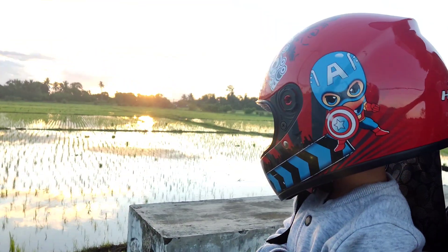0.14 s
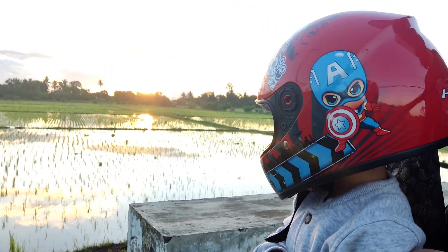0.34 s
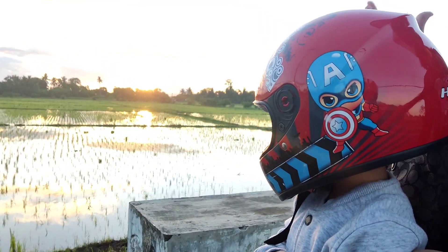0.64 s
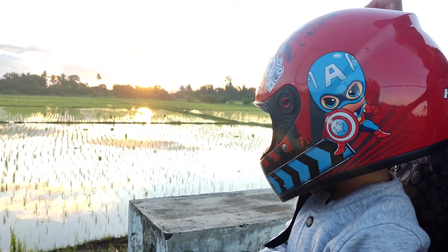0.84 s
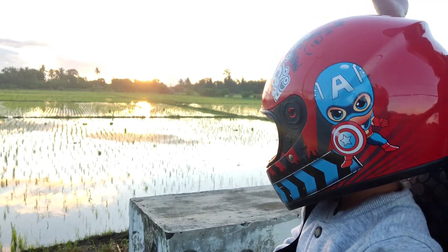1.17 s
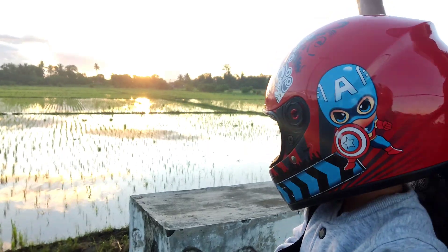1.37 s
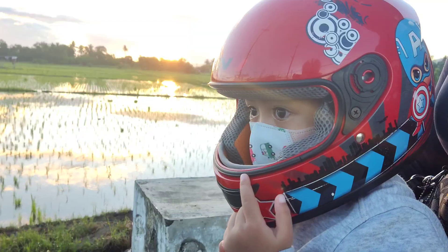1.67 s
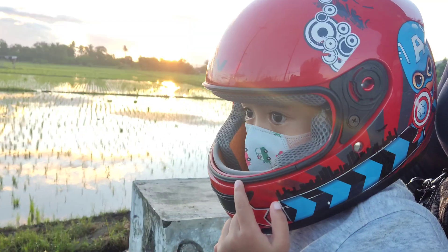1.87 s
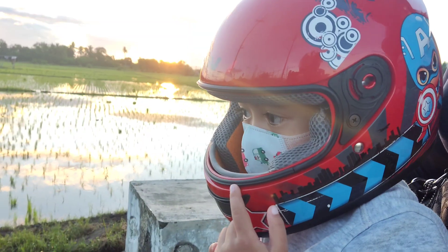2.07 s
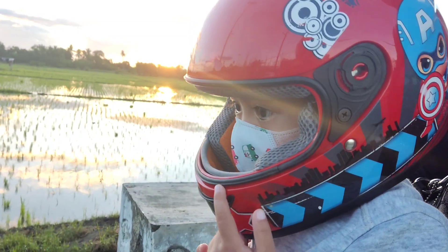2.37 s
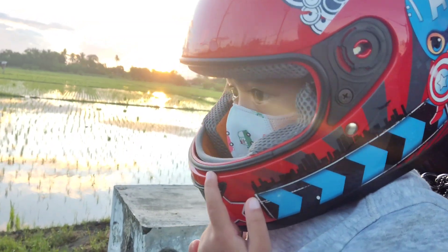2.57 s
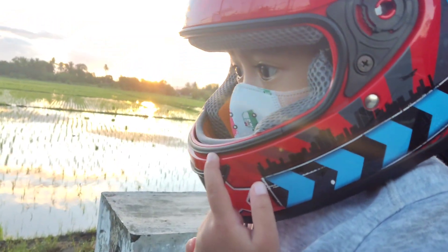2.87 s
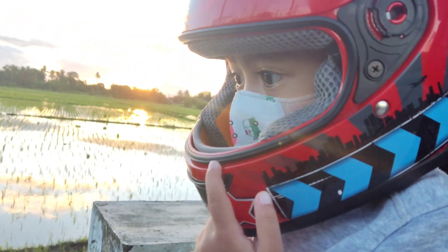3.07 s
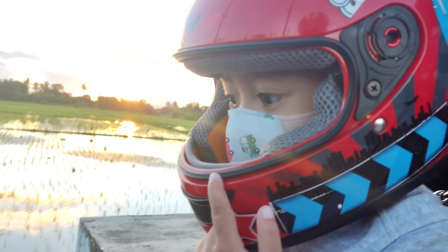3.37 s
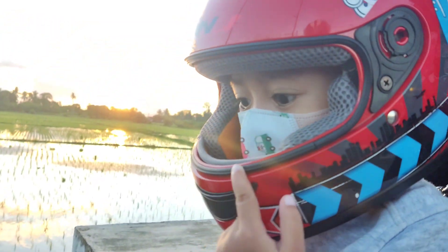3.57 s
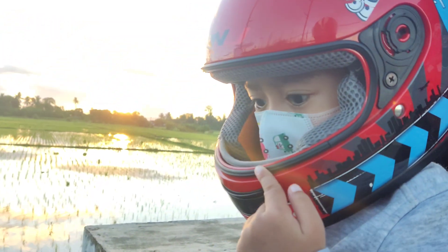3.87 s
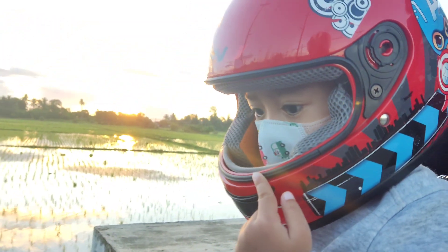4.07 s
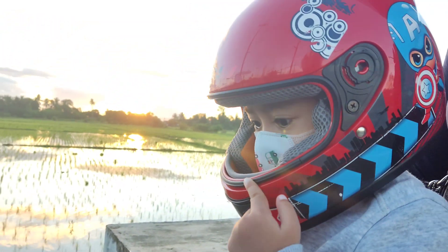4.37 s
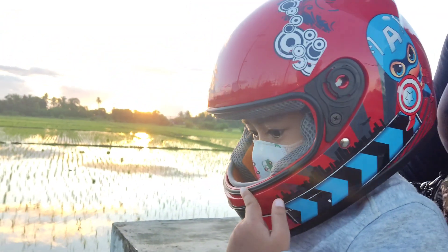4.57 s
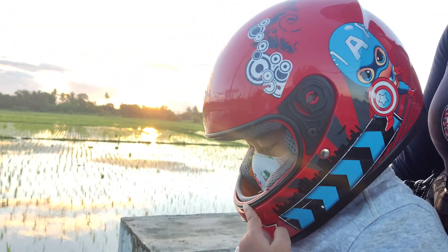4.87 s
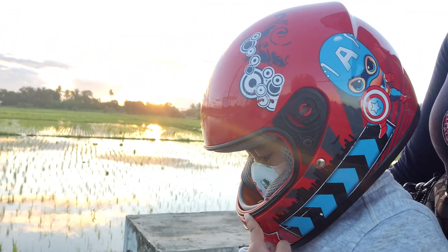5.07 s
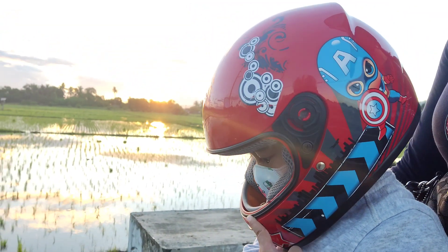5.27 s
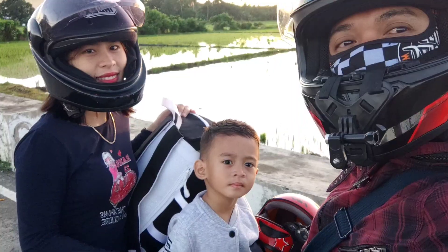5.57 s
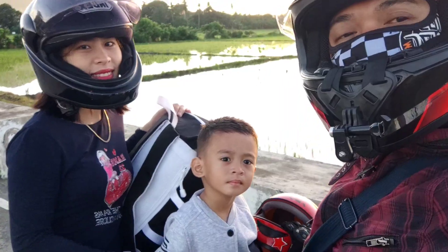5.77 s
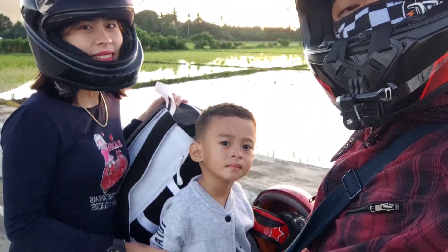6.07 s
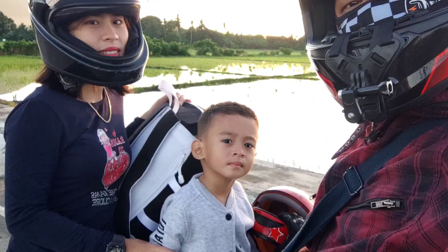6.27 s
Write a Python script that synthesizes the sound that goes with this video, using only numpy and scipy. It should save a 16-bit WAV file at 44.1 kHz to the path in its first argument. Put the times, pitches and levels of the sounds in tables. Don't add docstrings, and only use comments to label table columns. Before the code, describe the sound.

Idling motor with jingling keys, click, a motorcycle swelling past right to left with dropping pitch, click, then quiet open field with faint insects.

```python
import sys
import numpy as np
from scipy import signal
from scipy.io import wavfile
from scipy.ndimage import uniform_filter1d, map_coordinates

SR = 44100
rng = np.random.default_rng(int(sys.argv[2]) if len(sys.argv) > 2 else 0)


def put_to_file(sound):
    columns = np.atleast_2d(sound).T
    safe = np.clip(columns, -1, 1)
    whole_steps = np.round(safe * 32767)
    wavfile.write(sys.argv[1], SR, whole_steps.astype(np.int16))


def level_to_linear(level):
    exponent = np.asarray(level, float) / 20
    return 10 ** exponent


N = 283999
SIZE, HOP = 1024, 256
T = np.arange(N) / SR
HZ = np.fft.rfftfreq(SIZE, 1 / SR)
TALL_HZ = HZ[:, None]
FRAME_T = np.arange(N // HOP + 5) * HOP / SR

# start and end in seconds, fade-in in seconds,
# closing click on the left and on the right in dB.
PARTS = [
    (0, 1.5558, 0.00035, -15.5, -13),
    (1.599, 5.4559, 0.3, -11, -19),
    (5.498, 6.5, 0.23, -90, -90),
]
# time in seconds, then the samples by which the left port hears
BEARING = [(1.6, 15.5, 14, 16.5), (2.3, 16.5, 12.5, 15), (2.6, 15, 11, 13.5), (2.95, 13, 12, 10.5),
           (3.2, 14, 6.5, 9), (3.4, 12, 3, 8), (3.65, 7, -5, 7.5), (3.8, -1, -3, -3.5), (3.9, -6, -10, -11),
           (4.0, -16.5, -16.5, -11.5), (4.08, -26, -18.5, -14.5), (4.3, -20, -18, -16.5),
           (4.55, -21.5, -20, -19.5), (4.75, -18.5, -22.5, -23.5), (5.46, -20.5, -25, -22.5)]


def evened(x):
    return x / np.sqrt(np.mean(x ** 2) + 1e-20)


def bump(t, middle, width, power=2):
    return np.exp(-((t - middle) / width) ** power)


def curve(rows, t=T):
    s, *columns = np.transpose(rows)
    return [np.interp(t, s, c) for c in columns]


def colour(rows, hiss_db=-99):
    f, *columns = np.transpose(rows)
    levels = [np.interp(np.log(HZ + 1), np.log(f + 1), np.maximum(c, hiss_db)) for c in columns]
    return np.array(levels)[..., None]


def drift(rate_hz, count=1):
    knots = rng.standard_normal((count, 2000))
    return [np.interp(T, FRAME_T, map_coordinates(k, [FRAME_T * 2 * rate_hz], order=3)) for k in knots]


def resonate(x, hz, width):
    turn = np.exp(2j * np.pi * hz * T[:len(x)])
    r = np.exp(-np.pi * width / SR)
    return 2 * (turn * signal.lfilter([1 - r], [1, -r], x / turn)).real


def noise(db, lag, patchy_db, alike, likeness=None):
    # frequency in Hz, left-right likeness from 0 to 1.
    usual_likeness = [(30, 1), (500, 0.84), (1500, 0.76), (3000, 0.42), (6000, 0.29), (9000, 0.042)]
    f, value = np.transpose(likeness or usual_likeness)
    a, b, c, d, patches = rng.standard_normal((len(FRAME_T), len(HZ), 5)).T
    patches = uniform_filter1d(patches, size=10, axis=0)
    patches = evened(uniform_filter1d(patches, size=12, axis=1))
    same = alike ** np.clip(TALL_HZ / 400, 0, 1)
    same = np.clip(same * np.interp(np.log(HZ + 1), np.log(f), value)[:, None], 0, 1)
    right = a + 1j * b
    left = same * right * np.exp(-2j * np.pi * TALL_HZ * lag / SR)
    left = left + np.sqrt(1 - same ** 2) * (c + 1j * d)
    z = np.array([left, right]) * level_to_linear(db + patchy_db * patches) * np.sqrt(SR * 3 / 2 / SIZE)
    return signal.istft(z, nperseg=SIZE, noverlap=SIZE - HOP)[1][:, :N]


def puffs(hz, depth, decay):
    since_firing = np.cumsum(hz) / SR % 1
    return evened(1 - depth + depth * np.exp(-since_firing / decay) / decay)


def firing_phase(levels_db):
    half = np.concatenate([levels_db[:1], levels_db, np.full(len(levels_db), levels_db[-1] - 11.5)])
    circle = np.concatenate([half, half[:0:-1]]) * np.log(10) / 20
    return -signal.hilbert(circle).imag[1:len(levels_db) + 1]


def exhaust(part, hz, multiples, levels_db, starts, lag, waver_db, slip, waver_hz):
    turns = np.cumsum(hz) / SR
    span = (T >= part[0]) & (T < part[1] + .05)
    turns = np.array([turns - hz * lag / SR, turns])[:, span]
    wavers = drift(waver_hz, count=2 * len(multiples))
    out = np.zeros((2, N))
    for j, (k, db) in enumerate(zip(multiples, levels_db)):
        phase = 2 * np.pi * k * turns + starts[j] + slip * wavers[2 * j][span]
        out[:, span] += np.sqrt(2) * level_to_linear((db + waver_db * wavers[2 * j + 1])[span]) * np.cos(phase)
    return out


def far_road(levels_db, patchy_db, alike):
    # frequency in Hz, samples by which the left port is late.
    road_lag = [(1400, 14.9), (3400, 18.3)]
    return noise(levels_db, np.interp(HZ, *np.transpose(road_lag))[:, None], patchy_db, alike)


def field():
    # frequency in Hz, left and right level in dB per Hz.
    murmur = [(20, -81, -86), (50, -60, -60), (130, -62, -60.5), (230, -63.5, -65.5), (444, -68, -61.5),
              (764, -71, -72), (1320, -75, -74), (2230, -76, -78), (3540, -74.5, -112), (5600, -82, -99),
              (7360, -79, -77), (10900, -73, -74.5), (12330, -78.5, -138.0), (15100, -102.0, -126.0)]
    return far_road(colour(murmur) - 4, 1.87, 0.79)


def calm_road():
    # frequency in Hz, left and right level in dB per Hz.
    quiet = [(20, -79, -86), (50, -65, -68), (129, -69, -70), (230, -72.5, -71), (456, -75.5, -76),
             (800, -77.5, -77.5), (1310, -81.5, -79), (2330, -85.5, -87.5), (3380, -85, -87.5),
             (6400, -90.5, -91.5), (6940, -88.5, -82.5), (10330, -84, -82.5), (11560, -110.0, -110.0),
             (14200, -130.0, -130.0)]
    return far_road(colour(quiet, -102), 1.8, 1.0)


def birds():
    # start in seconds, pitch in Hz, length in seconds, level in dB.
    chirps = [
        (2.73, 5600, 0.017, -41),
        (6.343, 2380, 0.063, -53),
    ]
    return sum(level_to_linear(db) * np.sin(2 * np.pi * hz * T) * np.sin(np.pi * np.clip((T - s) / length, 0, 1))
               for s, hz, length, db in chirps)


def insects():
    # clicks a second, wing pitch in Hz, width in Hz, throb in Hz, level in dB, left port in dB.
    wings = [
        (120.8, 8990, 530, 15, -2.5, -40),
        (112.2, 8820, 550, 9.4, -4, -25),
        (234.7, 7190, 590, 7.3, -15, -2),
    ]
    # time in seconds, loudness of the whole chorus in dB.
    buzz = [(0, -36), (1.55, -38), (1.6, -41), (3.38, -36.5), (3.46, -41), (4.55, -38.5), (4.85, -47.5),
            (5.45, -36.5), (5.5, -54.5), (6.44, -52)]
    pauses = [.05, .17, .263, .37, .481, .599, .762, .868, .975, 2.304, 2.526, 3.231, 4.181]
    out = np.zeros((2, N))
    pause_db = -11 * sum(bump(T, s, .01) for s in pauses)
    for rate_hz, hz, width, throb_hz, db, left_db in wings:
        turns = np.cumsum(rate_hz * (1 + .04 * drift(7.4)[0])) / SR
        strokes = 0.13 + np.exp(-(turns % 1) / 0.29)
        strokes *= level_to_linear(1.46 * drift(throb_hz)[0] + pause_db * (hz > 8000))
        for port, gain_db in enumerate((left_db, 0)):
            scrape = strokes * rng.standard_normal(N)
            out[port] += level_to_linear(db + gain_db) * evened(resonate(resonate(scrape, hz, width), hz, width))
    return out * level_to_linear(curve(buzz)[0] + 3.0)


def whines():
    # start and end in seconds, pitch in Hz, level in dB, samples by which the left port is late.
    whine_tones = [
        (1.9, 3.45, 1830, -55, 15),
        (2.902, 3.4, 2380, -57, 13),
        (4.55, 5.1, 1462, -42.5, -23.5),
        (5.5, 6.6, 92.3, -50, 17),
        (5.5, 6.6, 159, -52, 14),
        (5.5, 6.6, 244.5, -62, 9),
        (5.5, 6.6, 361, -58, 14),
    ]
    out = np.zeros((2, N))
    for start, end, hz, db, late in whine_tones:
        tone = evened(resonate(rng.standard_normal(N), hz, 12))
        tone = tone * np.clip(np.minimum(T - start, end - T) / 0.13, 0, 1)
        out += level_to_linear(db) * np.array([np.roll(tone, round(late)), tone])
    return out


def keys():
    # time in seconds, peak level in dB, pitch in Hz, left over right in dB.
    touches = [(0.0493, -53, 13700, 8), (0.1092, -54, 12600, 15), (0.1241, -49, 13100, 22),
               (0.3257, -43, 13200, 10), (0.3391, -45, 13500, 18), (0.4145, -44, 13150, 8),
               (0.504, -28, 13000, 15), (0.5535, -39, 13200, 17), (0.6993, -32, 12610, 13),
               (0.7168, -33, 13400, 16), (0.7692, -36, 13550, 10), (0.8011, -31, 13500, 10),
               (0.8754, -36, 13300, 15.5), (0.9667, -38, 12850, 12), (1.0271, -42, 12500, 10),
               (1.432, -26.5, 13500, 10)]
    # pitch in Hz, level in dB.
    neighbours = [(12800, -3), (13150, -8), (13650, -4), (14000, -10)]
    t60_s, rise_s = .055, .018
    out, t = np.zeros((2, N)), T[:6000]
    chance = rng.standard_normal((len(touches), len(neighbours)))
    swell = np.sin(np.pi / 2 * np.minimum(t / rise_s, 1)) ** 2
    for (s, db, hz, pan_db), row in zip(touches, chance):
        ring = np.sin(2 * np.pi * hz * t)
        for (f, d), r in zip(neighbours, row):
            ring += level_to_linear(d + 3.5 * r) * np.sin(2 * np.pi * f * (1 + 0.0035 * r) * t)
        ring += level_to_linear(5.0) * resonate(rng.standard_normal(len(t)), 14200, 3500)
        ring *= level_to_linear(db - 5.5 - 60 * np.maximum(t - rise_s, 0) / t60_s) * swell
        out[:, round((s - .004) * SR):][:, :len(t)] += ring * level_to_linear([[0], [-pan_db]])
    return out


def idling():
    # multiple of the firing rate, level in dB.
    orders = [(1, -14.5), (2, -14), (3, -12), (4, -30), (5, -22), (6, -3), (7, -3.5), (8, -10), (9, -2),
              (10, 0), (11, -10), (12, -11.5), (13, -3.5), (14, -1.5), (15, -18.5), (16, -52), (17, -45),
              (18, -28), (19, -24), (20, -14), (21, -15), (22, -11.5), (23, -25.5), (24, -32.5)]
    # pitch in Hz, width in Hz, level in dB, samples by which the left port is late.
    casing = [(1365, 156, -50, 20.85), (1623, 290, -48, 14), (2278, 56, -53.5, 18.6)]
    # frequency in Hz, left and right level in dB per Hz.
    idle_roar = [(20, -84, -74), (49.7, -75, -70), (131, -60, -61.5), (220, -77.5, -78.5),
                 (407, -77, -55.5), (937, -64.5, -74.5), (1400, -77, -78), (2220, -69, -82.5),
                 (2950, -77.5, -83.5), (5930, -79, -85), (8140, -81.5, -94), (10100, -78.5, -76.5),
                 (12400, -87, -122), (14600, -95, -108.0)]
    hz = np.full(N, 46.08)
    db = -30 - 3.0 * np.maximum(T - .5, 0)
    multiples, levels_db = np.transpose(orders)
    starts = -.9 * firing_phase(levels_db) + 0.0655 * multiples ** 2 - 2 * np.pi * .59 * multiples
    tones = exhaust(PARTS[0], hz, multiples, levels_db, starts, 14.5, waver_db=1.2, slip=.2, waver_hz=7.23)
    tones *= level_to_linear([[-1.2], [1.2]])
    tones *= level_to_linear(db + 0.5) / np.linalg.norm(level_to_linear(levels_db))
    gate = puffs(hz, 0.061, 0.42)
    shake = gate * rng.standard_normal(N)
    for f, width, ring_db, late in casing:
        ring = level_to_linear(ring_db) * evened(resonate(resonate(shake, f, width), f, width))
        tones += [np.roll(ring, int(late)), level_to_linear(3.0) * ring]
    return tones + gate * noise(colour(idle_roar) - 1.5, 16.5, 1.3, 0.92)


def ride():
    # time in seconds, heard firing rate in Hz, throttle in dB.
    engine = [
        (1.6, 50.93, -3),
        (2.3, 50.9, -0.6),
        (3.2, 50.59, 1.5),
        (3.8, 49.7, -0.9),
        (4.34, 47.82, -1.5),
        (4.74, 47.25, 1),
        (5.0, 47.16, 1.2),
        (5.46, 47.54, 6),
    ]
    closest_s, speed_m_s, distance_m = 4.24, 12.07, 7.08
    hz, throttle_db = curve(engine)
    along = speed_m_s * (T - closest_s)
    away = np.hypot(along, distance_m)
    near_db, rear = -20 * np.log10(away / distance_m), along / away
    roar_db = -32.5 + near_db + 0.3 * throttle_db - 0.5 * rear
    return hz, throttle_db, near_db, rear, roar_db


def bike_exhaust():
    # multiple of the firing rate, level in dB.
    coming = [(0.5, -33), (1, 0.5), (1.5, -13), (2, 8.5), (2.5, -31), (3, 0), (3.5, -14), (4, 7),
              (4.5, -15), (5, -2.5), (5.5, -31), (6, -17.5), (6.5, -23), (7, -10.5), (7.5, -11), (8, -22.5),
              (8.5, -44), (9, -13), (9.5, -11), (10, -25), (10.5, -31), (11, -10.5), (11.5, -21), (12, -9)]
    leaving = [(0.5, -29), (1, 1.5), (1.5, 0), (2, 0), (2.5, -3.5), (3, -4.5), (3.5, -43), (4, 0),
               (4.5, -40), (5, -3), (5.5, -3), (6, -3), (6.5, -30), (7, -10), (7.5, -28), (8, 2),
               (8.5, -27), (9, -10), (9.5, -33), (10, -27), (10.5, -34), (11, -30), (11.5, -43), (12, -47)]
    # multiple, level in dB.
    firm = [(2, 3.5), (3, 2), (4, -3.5), (5, 1.1)]
    # multiple, time in seconds,
    # how long it lasts in seconds, lift in dB.
    lifts = [(2, 2.2, 0.81, 2.5), (2, 4.21, 0.31, 6.5), (3, 2.2, 0.69, 4), (3, 3.78, 0.22, 6),
             (3, 4.57, 0.2, 3), (3, 5.4, 0.12, -15), (3, 5.4, 0.08, -8), (4, 3.52, 0.47, 9.5),
             (3, 5.15, .1, -5), (13, 3.9, .2, 6), (4, 5.04, 0.27, 10), (5, 2.93, 0.41, 4),
             (5, 3.62, 0.091, -5), (5, 4.32, 0.44, 6.5), (5, 4.8, 0.099, -20), (5, 5.27, 0.12, 5),
             (6, 4.64, 0.17, 8.5), (6, 4.2, 0.17, -8), (3, 4.2, .1, 0), (4, 2.4, 0.55, -11),
             (4, 5.38, .1, 3), (6, 4.98, 0.32, -6), (7, 5.5, 0.37, 7), (8, 4.63, .1, 4),
             (8, 4.88, 0.18, -7), (8, 5.2, .16, 2), (9, 5.2, .35, 7.5), (10, 2.9, .2, 8),
             (11, 3.6, .25, 2.5), (1.5, 4.65, 0.29, -4), (1.5, 5.3, 0.24, 4.5), (1, 2.8, .2, -1)]
    hz, throttle_db, near_db, rear, roar_db = ride()
    pipe_lag, _, chain_lag = curve(BEARING)
    db = -29 + near_db + throttle_db + 0.5 * rear
    side = np.clip((-10 - chain_lag) / 13, 0, 1)
    multiples, coming_db = np.transpose(coming)
    levels_db = [db - 10.5 + (1 - side) * (c + 3) + side * l for c, (_, l) in zip(coming_db, leaving)]
    for k, gain_db in firm:
        levels_db[2 * round(k) - 1] = db - 11.0 + gain_db
    blow = np.pi - .5 + .03 * multiples ** 2 + 2.6 * (multiples % 1)
    upper = np.arange(13, 35)
    bark_db = roar_db - 20 - 0.17 * (upper[:, None] - 13)
    for k, s, lasts, lift_db in lifts:
        level = levels_db[round(2 * k) - 1] if k < 13 else bark_db[round(k) - 13]
        level += lift_db * bump(T, s, lasts, 4)
    tones = exhaust(PARTS[1], hz, multiples, levels_db, blow, 0.74 * pipe_lag,
                    waver_db=1.2, slip=.3, waver_hz=4.6)
    return tones + exhaust(PARTS[1], hz, upper, bark_db, 0.0204 * upper ** 2, pipe_lag,
                           waver_db=4.1, slip=0.95, waver_hz=6)


def turning_colour(casing_lag):
    # frequency in Hz,
    # left and right level in dB per Hz.
    front = [(20, -68, -69.0), (50, -75, -74), (129, -51.5, -49), (231, -49.5, -69), (450, -60.5, -58.5),
             (845, -65.5, -61.5), (1690, -60.5, -58.5), (2360, -63.5, -63.5), (3940, -65, -64.5),
             (5660, -72, -68.5), (7200, -73, -73.5), (10000, -76, -70), (11900, -76, -82),
             (14400, -82, -99.0)]
    flank = [(20, -69.0, -65.0), (50, -68, -74), (128, -50, -49), (227, -50, -43), (452, -58.5, -61),
             (790, -59.5, -62), (1424, -61, -65.5), (2700, -65.5, -70.5), (3260, -63, -67.5),
             (5100, -70.5, -72), (7560, -66, -69), (9900, -66.5, -70), (11200, -62, -86),
             (14300, -73, -117.0)]
    behind = [(20, -71, -72), (49.4, -45, -57), (130, -55, -49.5), (228, -45.5, -60), (450, -54.5, -62.5),
              (780, -71, -62), (1330, -66.5, -65.5), (2450, -71.5, -71.5), (3400, -69, -74.5),
              (5340, -72.5, -78), (7550, -75, -76.5), (10200, -76.5, -72), (11100, -66, -116),
              (15200, -79, -99.0)]
    # time in seconds, how long it lasts in seconds, echo delay in milliseconds,
    # echo share on the left and on the right from 0 to 1.
    kerb = [(2.296, 0.6, 2.2, 0.2, 0.14), (2.996, 0.7, 3.02, 0.6, 0.4), (3.2, 0.56, 2.07, 0.05, 0.37),
            (3.653, 0.4, 2.85, 0.2, 0.42), (4.2, 0.79, 1.2, 0.06, 0.1), (4.547, 0.45, 2.57, 0.1, 0.4),
            (4.95, 0.29, 1.98, 0.2, 0.3)]
    turned = np.clip((6 - casing_lag) / 24, 0, 1)
    shape = (1 - turned) * colour(front) + turned * colour(flank)
    shape += np.clip((-19 - casing_lag) / 3.7, 0, 1) * (colour(behind) - colour(flank))
    for s, lasts, delay_ms, *share in kerb:
        share = np.clip(share, 0, .9)[:, None, None] * bump(FRAME_T, s, lasts, 4)
        share = share / (1 + (TALL_HZ / 2800) ** 4)
        shape += 20 * np.log10(abs(1 + share * np.exp(-2j * np.pi * TALL_HZ * delay_ms / 1000)))
    return shape


def port_shade():
    # time in seconds, how long it lasts in seconds, pitch in Hz, left and right change in dB.
    shades = [(3.3, .3, 1160, -7, 3), (3.723, 0.13, 1620, 3.5, 4.5), (3.85, 0.4, 597, 3.5, 4),
              (3.995, 0.071, 1400, -4, -3.5), (4.146, .12, 560, -4, 1), (4.883, .15, 1090, 2, 3),
              (5.36, .15, 560, -1, -2), (3.172, .15, 400, -3, -3), (4.296, 0.73, 3100, 0.5, -2.5),
              (3.153, 0.25, 1510, 5, 4.5), (4.45, 0.15, 1147, -1, 3.5)]
    total = 0
    for s, lasts, f, *ports_db in shades:
        octaves = np.log2((TALL_HZ + 1) / f)
        total = total + np.reshape(ports_db, (2, 1, 1)) * bump(FRAME_T, s, lasts) * bump(octaves, 0, 0.43)
    return total


def bike_roar():
    part_hz = [806, 1840, 2820]
    # frequency in Hz, left-right likeness from 0 to 1.
    bike_same = [(30, 0.73), (400, 0.99), (850, 0.82), (1200, 0.44), (2000, 0.7), (2800, 0.72), (4500, 0.8),
                 (6000, 0.44), (9000, 0.096)]
    hz, throttle_db, near_db, rear, roar_db = ride()
    hiss_db = -36 + near_db + 1.0 * throttle_db + 2.5 * rear
    hiss_db += 6 * bump(T, 4.296, 0.23)
    lags = np.array(curve(BEARING, FRAME_T))
    shape = turning_colour(lags[1])
    power = level_to_linear(2 * shape).mean(0) * HZ[1]
    roar_db, hiss_db = np.interp(FRAME_T, T, roar_db), np.interp(FRAME_T, T, hiss_db)
    roar_db -= 10 * np.log10(power[(HZ > 600) & (HZ < 3000)].sum(0)) - 1.5
    hiss_db -= 10 * np.log10(power[HZ > 3000].sum(0)) - 2.5
    high = np.clip(np.log2((TALL_HZ + 1) / 2000) / 0.85, 0, 1)
    shape -= 9 * np.clip((500 - TALL_HZ) / 250, 0, 1)
    alike = 0.87 * (1 - 0.92 * bump(FRAME_T, 3.9, 0.28) * np.clip(TALL_HZ / 2000 - .7, 0, 1))
    alike *= 1 - .45 * np.clip((FRAME_T - 4.4) / 0.18, 0, 1) * np.clip(TALL_HZ / 600 - 6, 0, 1)
    part = np.interp(HZ, part_hz, np.arange(3))[:, None]
    lag = sum(np.clip(1 - abs(part - k), 0, 1) * v for k, v in enumerate(lags))
    levels_db = shape + port_shade() + (1 - high) * roar_db + high * hiss_db
    return puffs(hz, 0.099, 0.52) * noise(levels_db, lag, 1.49, alike, bike_same)


def passing():
    return bike_exhaust() + bike_roar()


def scene():
    later = np.where(T < PARTS[1][1] + .01, passing() + field(), calm_road())
    road = np.where(T < PARTS[0][1] + .01, idling() + keys(), later)
    return road + whines() + insects() + birds()


def band_power(z):
    return np.repeat((abs(z) ** 2).reshape(2, 128, 4, -1).mean(2), 4, axis=1)


def thin_out(x, top_hz, masked_db, follow):
    # frequency in Hz, level in dB under which a band is dropped.
    faint = [(2500, -89), (4500, -82), (6500, -79.5), (6900, -85), (10900, -83), (11100, -78),
             (14000, -83.5)]
    hz, _, z = signal.stft(x, SR, nperseg=SIZE)
    hz, z = hz[:-1, None], z[:, :-1]
    both, apart = (z[0] + z[1]) / 2, (z[0] - z[1]) / 2
    both_power, apart_power = uniform_filter1d(band_power(np.array([both, apart])), size=8)
    masked_db = masked_db + 3.2 * (hz > 2400) * (hz < 6900) + 2 * (hz > 5050) * (hz < 6800)
    both = both * ((both_power > apart_power * level_to_linear(2 * masked_db)) | (hz < 1000))
    apart = apart * ((apart_power > both_power * level_to_linear(2 * masked_db)) | (hz < 2000))
    coarse, least_share = (hz > 1000) & (hz < 7500), 0.3
    both = both * ((abs(both) ** 2 > least_share * both_power) | ~coarse)
    apart = apart * ((abs(apart) ** 2 > least_share * apart_power) | ~coarse)
    z = np.array([both + apart, both - apart])
    loud_db = 10 * np.log10(uniform_filter1d((abs(z) ** 2).sum(axis=(0, 1)), size=5) + 1e-12)
    floor_db = np.interp(hz, *np.transpose(faint), left=-120)
    floor_db = floor_db + follow * (loud_db + 43.0)
    whim = rng.standard_normal((2, 128, z.shape[2] // 5 + 1)).repeat(4, axis=1).repeat(5, axis=2)
    whim = whim[..., :z.shape[2]]
    floor_db = floor_db + np.array([0, 7])[:, None, None] * (hz > 11100) + 5.5 * whim
    power = band_power(z)
    shaded = (power < power[::-1] * level_to_linear(2 * (2.5 * whim - 13))) & (hz > 11100)
    z = z * np.clip(hz / 45 + .3, 0, 1) * (power > level_to_linear(2 * floor_db)) * ~shaded * (hz < top_hz)
    return signal.istft(np.pad(z, ((0, 0), (0, 1), (0, 0))), SR, nperseg=SIZE)[1][:, :N]


def roll_off(x):
    return signal.sosfilt(signal.butter(12, 14630, fs=SR, output="sos"), x)


def record(dry):
    dry = thin_out(dry, top_hz=14256, masked_db=-6.5, follow=0.68)
    out = np.zeros_like(dry)
    for start, end, fade, *click_db in PARTS:
        since, after = T - start, T - end
        gain = np.clip(since / fade + 0.13, 0, 1) ** 0.89 * (after < 0) * (since >= 0)
        smear = level_to_linear(-40 - 1300 * np.clip(after, 0, 1)) * (after >= 0)
        offset = (start > 0) * 0.025 * np.exp(-np.maximum(since, 0) / 0.21)
        click = -level_to_linear(click_db)[:, None] * np.exp(-(after / 0.00011) ** 2 / 2)
        out += (gain + smear) * dry + gain ** 2.2 * offset + click
    return roll_off(out)


dry = scene()
out = record(dry)
put_to_file(out)
```